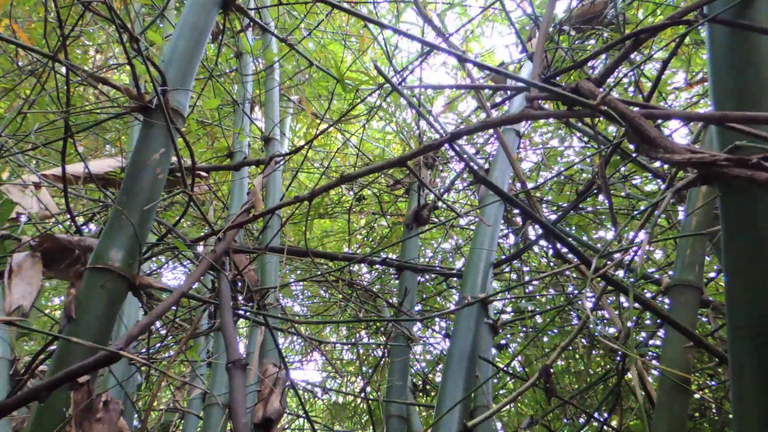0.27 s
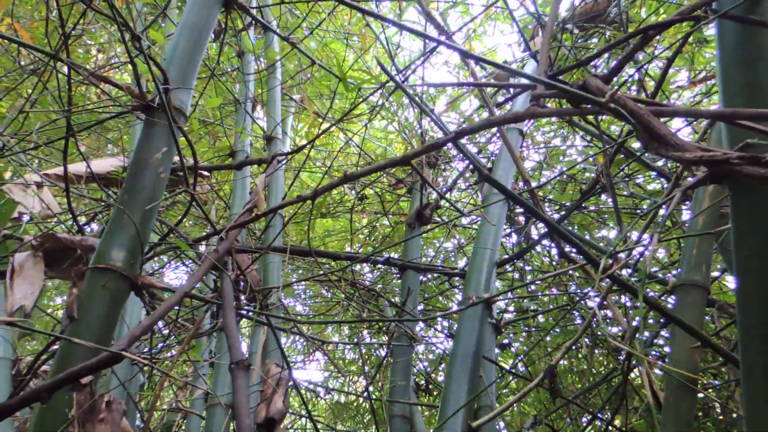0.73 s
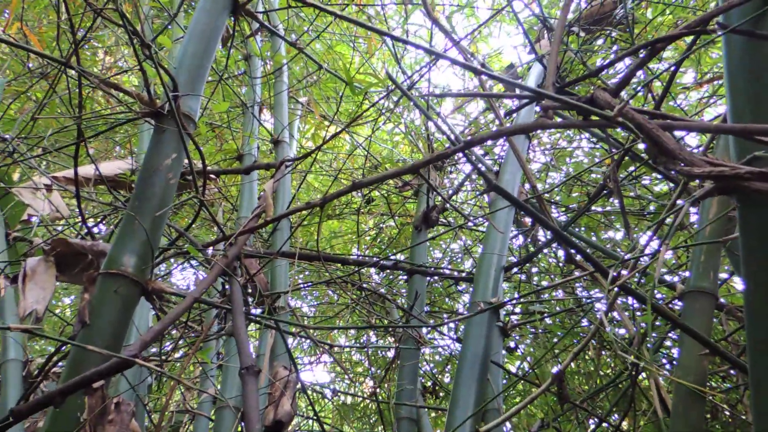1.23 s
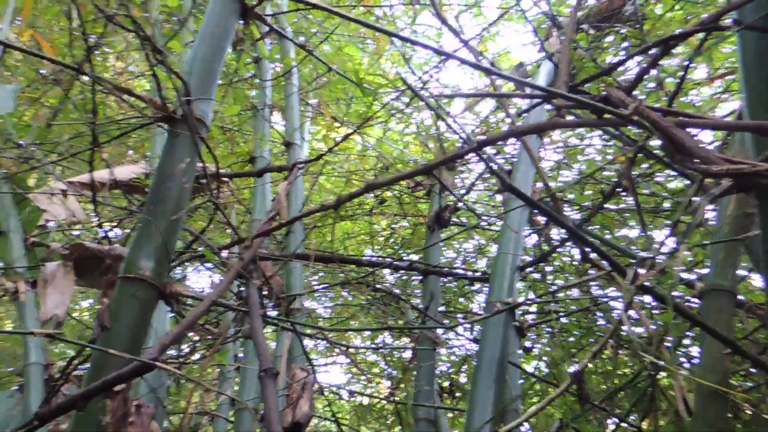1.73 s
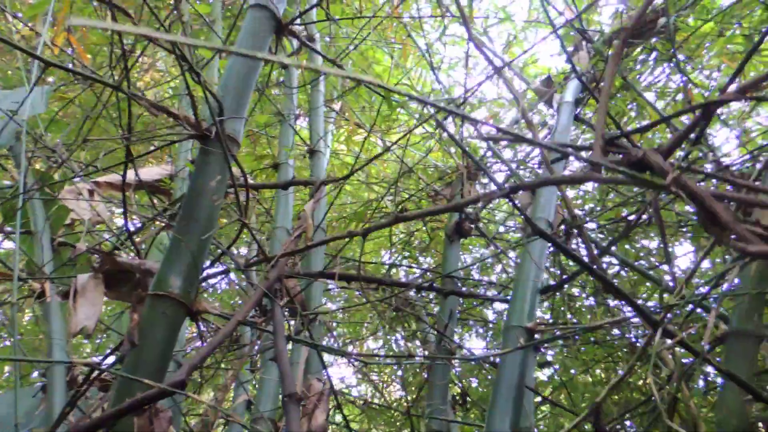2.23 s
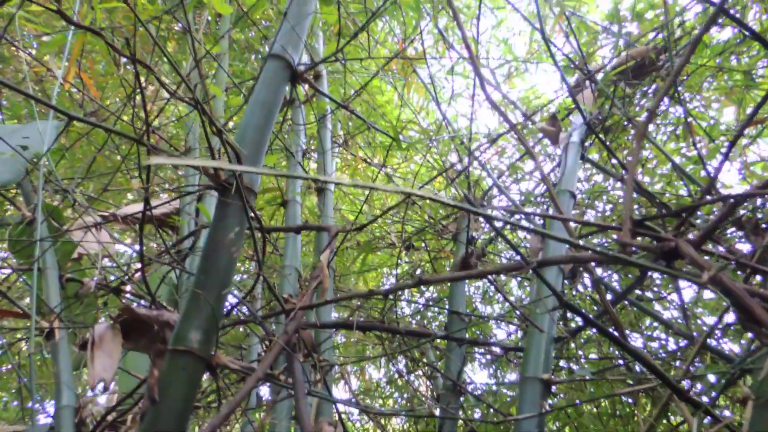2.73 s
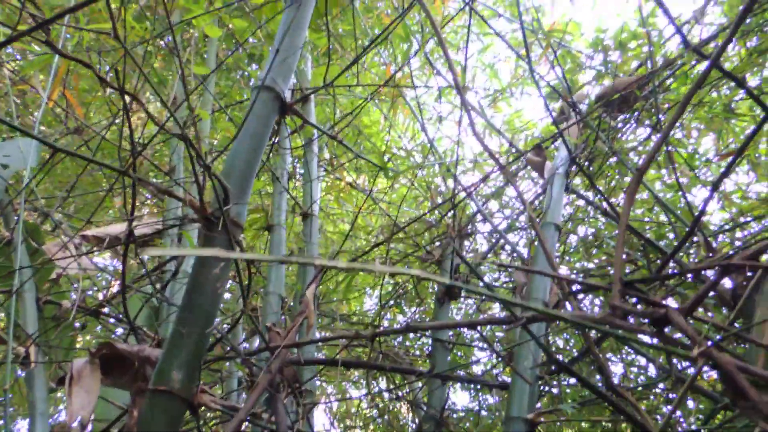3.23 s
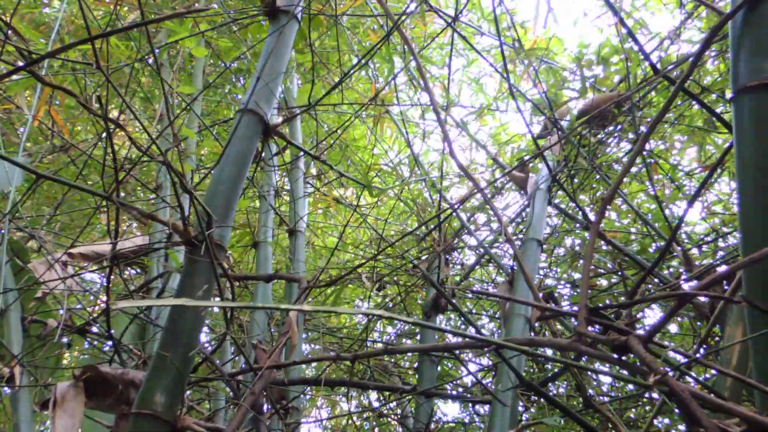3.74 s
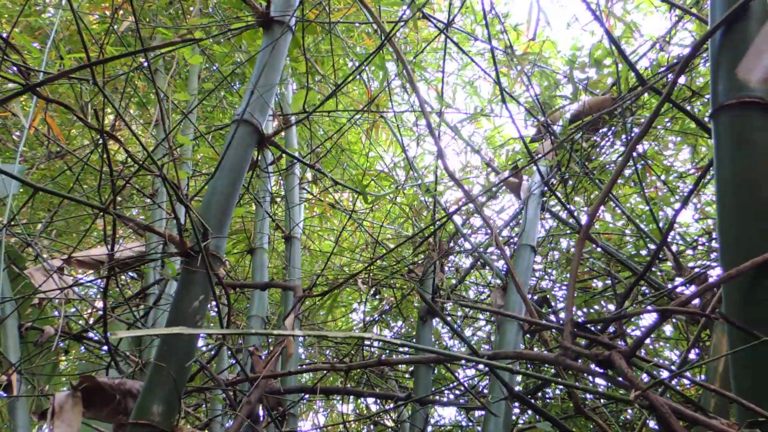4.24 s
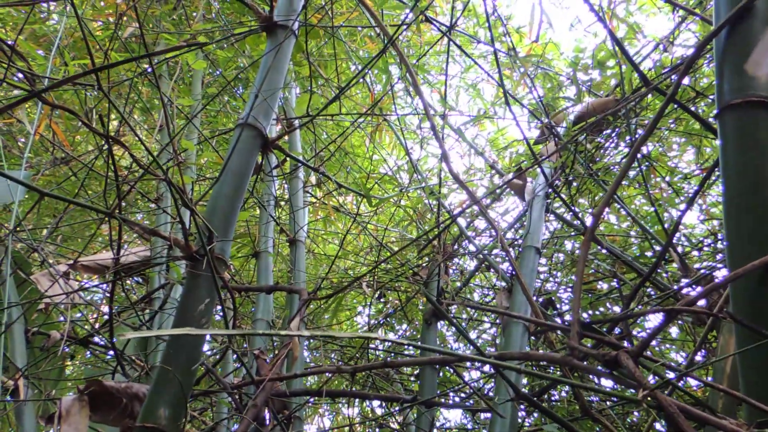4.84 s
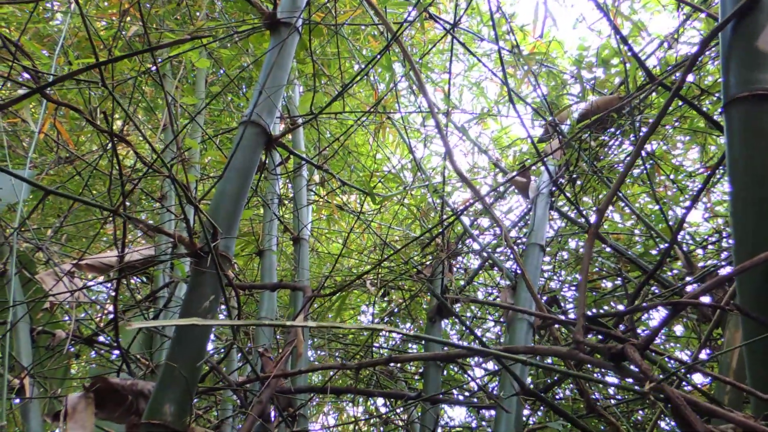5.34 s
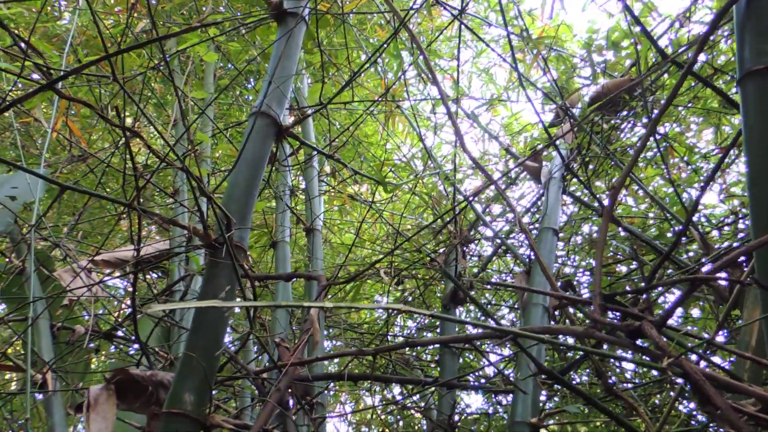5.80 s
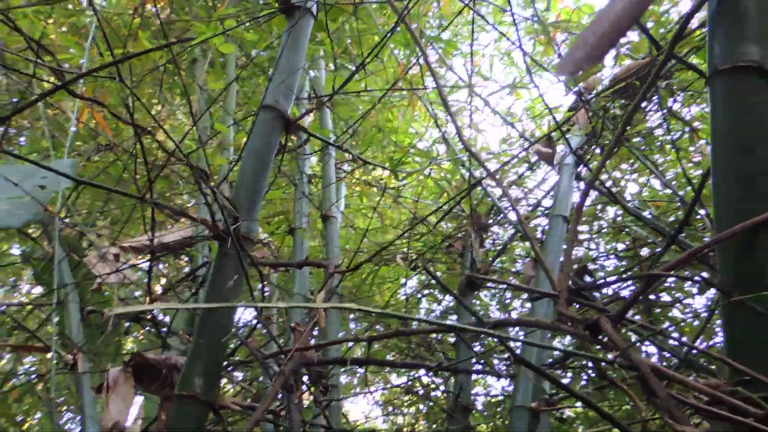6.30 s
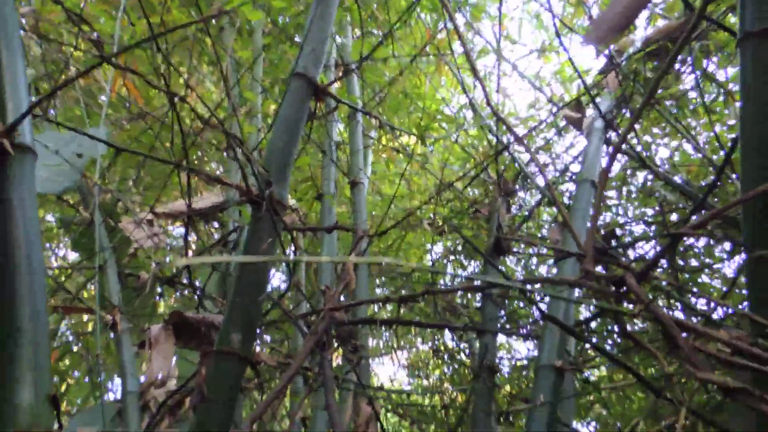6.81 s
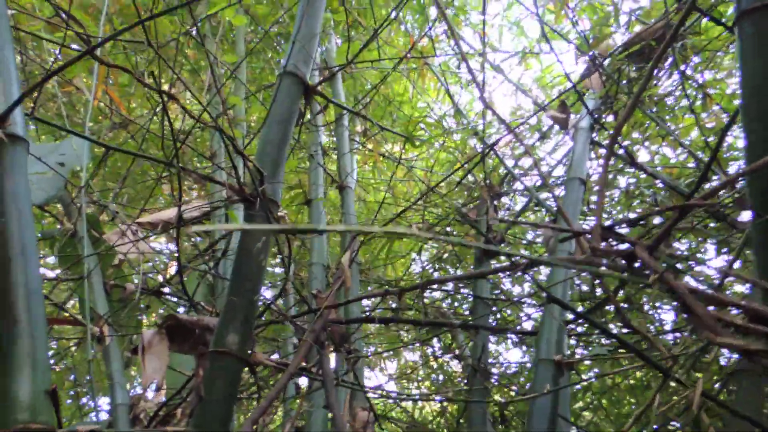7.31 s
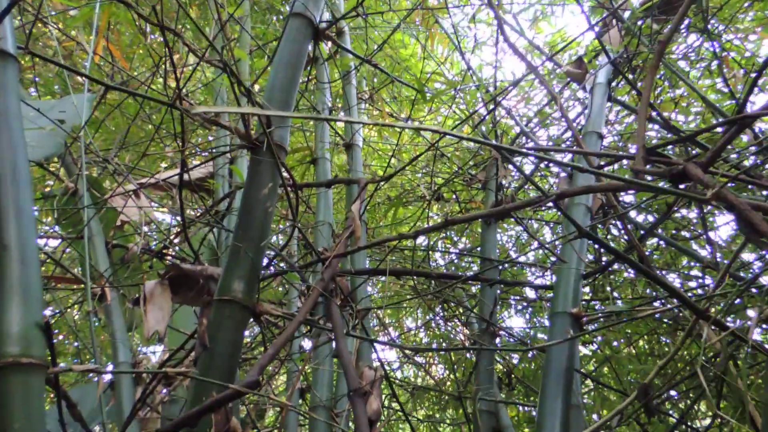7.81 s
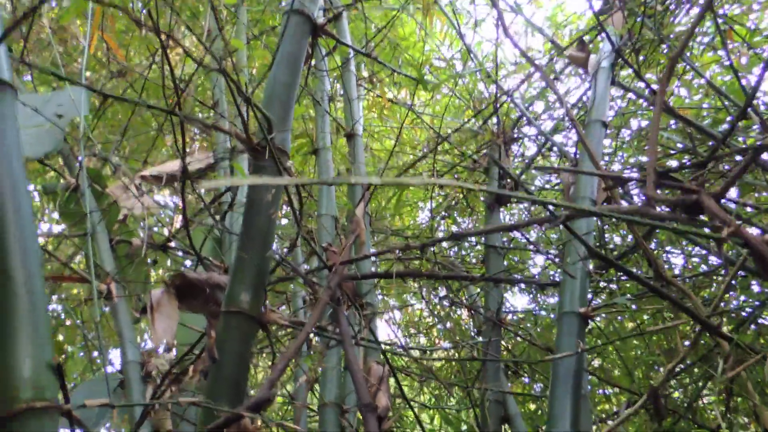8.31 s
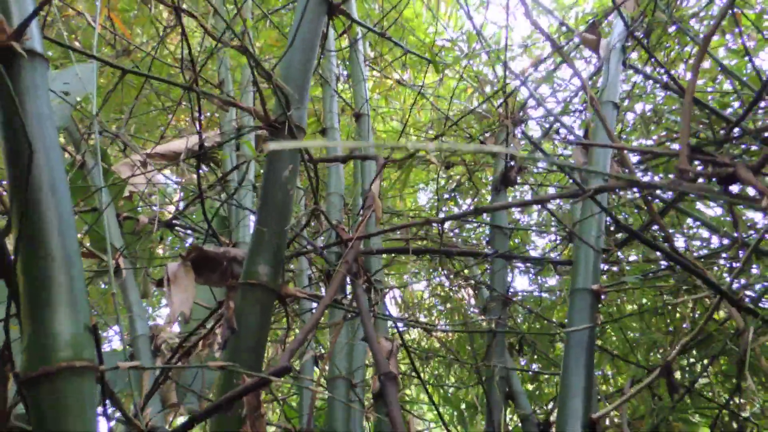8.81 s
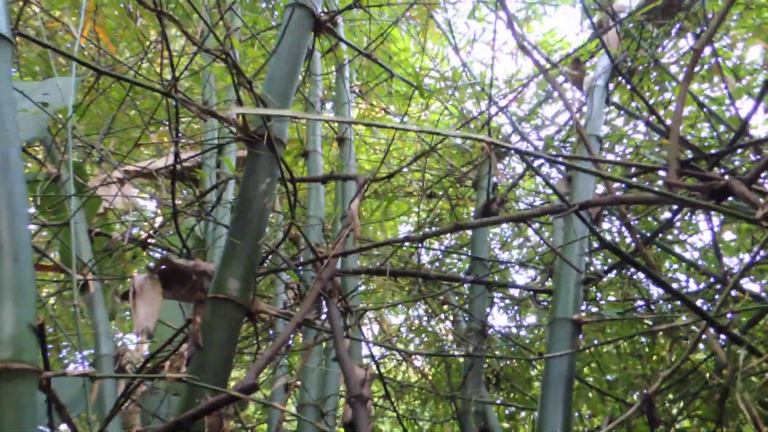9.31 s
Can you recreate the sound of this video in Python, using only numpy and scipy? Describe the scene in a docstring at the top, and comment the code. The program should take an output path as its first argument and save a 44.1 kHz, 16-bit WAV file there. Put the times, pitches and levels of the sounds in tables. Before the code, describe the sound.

One small bird repeats a clear, high three-note whistle three times, scattered into a short tail by the stems. Beneath it run a constant rasping cicada, a soft pulsing cricket and a low woodland wash. After the second phrase, dry leaves crackle close by, with tiny twig snaps around the last phrase. Faint distant birds and a wavering motor hum are behind. The handheld microphone feeds the right side; the left only hisses faintly.

```python
"""A small bird whistles a three-note phrase three times; bamboo stems scatter it into a dense tail.
The bird is a gliding near-sine, the cicada and the cricket are noise ringing at a few pitches,
the leaves are crackling hiss, the twigs short ticks, the far birds gliding tones and the far motor two wavering tones.
One microphone feeds only the right input; the left carries the hiss of its own amplifier.
A steady low tone is in both inputs."""
import sys
import numpy as np
from scipy import signal
from scipy.fft import rfft, irfft
from scipy.io import wavfile
from scipy.ndimage import uniform_filter1d

SR = 44100
rng = np.random.default_rng(int(sys.argv[2]) if len(sys.argv) > 2 else 0)


def file_out(sig):
    """Save sig as 16-bit WAV at sys.argv[1]."""
    # one column per channel
    cols = np.atleast_2d(sig).T
    # limit, then scale
    lim = np.clip(cols, -1, 1)
    pcm = np.round(lim * 32767).astype(np.int16)
    wavfile.write(sys.argv[1], SR, pcm)


N = 421155
T = np.arange(N) / SR  # time of every sample [s]

# Levels at the microphone count before the input's gain in record().
# The bird's three note shapes: (share of the note's length, pitch / home pitch, level [dB])
RISE_SHAPE = [(0, 1., -24), (.15, 1.025, -5.5), (.3, 1.07, 0), (.45, 1.16, -3.5), (.6, 1.27, -4.5),
              (.75, 1.3, -8.5), (1, 1.28, -10)]
HOOK_SHAPE = [(0, 1.44, -19), (.08, 1.29, -13), (.15, 1.08, -4), (.24, 1., 0), (.34, 1.02, -1.5),
              (.44, 1.085, 0.5), (.64, 1.22, -1), (.79, 1.32, -0.5), (.87, 1.45, -0.5), (.93, 1.61, -3.5),
              (1, 1.8, -9)]
SLIDE_SHAPE = [(0, 0.935, -13), (.05, .985, -4), (.1, 1., -0.5), (.25, .95, -1.5), (.38, .84, -5),
               (.53, .68, -17), (.65, .63, -19.5), (.85, .75, -14.5), (1, .77, -19)]
# The notes sung in each shape: (start [s], length [s], home pitch [Hz], last pitch [Hz], level [dB],
# lift of the opening [dB], lift of the close [dB])
RISE_NOTES = [(1.165, 0.076, 2833, 3530, -30.5, -2, 4.5), (4.95, 0.08, 2803, 3590, -32, 13, 0),
              (8.016, .084, 2838, 3570, -31.5, -11, 0)]
HOOK_NOTES = [(1.455, 0.1, 2810, 5150, -26.5, -4., -2.), (5.249, 0.098, 2780, 4700, -26.5, 5.5, -1.5),
              (8.308, 0.1, 2793, 5300, -28, -3., -1.27)]
SLIDE_NOTES = [(1.645, 0.13, 2500, 1900, -30, -1.5, -9), (5.446, 0.12, 2446, 1920, -34.5, 1.3, 6),
               (8.51, .125, 2473, 1930, -34.5, -2., 0)]
OPENING, CLOSE = 0.11, 0.23  # shares of a note over which these lifts fade
# Faint overtones of the bird: (multiple of the pitch, level [dB])
BIRD_OVERTONES = [(2, -52), (3, -28.5), (4, -44), (6, -31)]
# Extra overtone level towards the top: (frequency [Hz], lift [dB])
OVERTONE_LIFT = [(5000, -6), (9000, -6.5), (11000, -5), (12500, 7.5), (14000, 12)]
# Brief dips and jumps of the song's level: (time [s], width [s], change [dB])
SONG_CATCHES = [(1.216, .006, -7), (1.462, .006, -1), (1.542, 0.0045, 2.5), (5.28, 0.0095, -8),
                (5.293, .006, 5), (5.311, .005, -3), (8.076, 0.0066, -12)]

# Time the late scattered tail takes to die by 60 dB: (frequency [Hz], time [s])
TAIL_TIMES = [(1500, 0.97), (3000, 0.48), (5000, 0.84), (12000, 0.6)]
# Strength of the scattered tail: one level per phrase [dB]
PHRASE_SCATTER_DB = [.5, 0., 1.5]
# Single echoes off the closest stems: (delay [s], level [dB])
NEAR_ECHOES = [(.0031, -20.5), (.0079, -13), (0.0131, -17), (.021, -11.5)]

# The cicada's strength: (time [s], level [dB], lift of the steady rings [dB])
BUZZ_LEVELS = [(0, -44, 0.5), (1.1, -44.5, 1), (2.45, -44, 2.5), (2.65, -45, -4.), (3.8, -43.5, -1),
               (4.5, -43.5, 1), (4.75, -43, 1), (6.5, -44, .5), (8.3, -43.5, 0.5), (9.55, -44.5, -1.5)]
# Drift of the buzz beat: (time [s], lead [beats])
BUZZ_DRIFT = [(0, 0.16), (2.3, 0.13), (3.8, 0.49), (5.7, 0.18), (6.6, 0.04), (7.5, -.08), (8.2, -0.16),
              (9.55, -0.23)]
# Resonances of the cicada's body: (frequency [Hz], width [Hz], relative level [dB])
BODY_RINGS = [(5858, 90, -14), (5922, 47, -14.5), (6104, 120, -7), (6360, 217, -3), (6894, 140, -10),
              (7440, 700, -13.5), (12700, 300, -26)]
# Its steadiest rings, kept from beat to beat: (middle frequency [Hz], width [Hz], relative level [dB])
STEADY_RINGS = [(6300, 49, -8), (6374, 51, -6.5), (6450, 53, -6.5)]
BUZZ_PER_S, BUZZ_SAG_HZ_PER_S = 80.8, 5.  # the steady rings sink slowly
BUZZ_WAVER_DB, BUZZ_WAVERS_PER_S = .7, 12.

# The cricket's pace and strength: (time [s], lead over the steady beat [chirps], level [dB])
CRICKET_PACE = [(0, -.55, -50.5), (.9, -.76, -49), (1.6, -0.68, -47.5), (2.0, -0.58, -50),
                (2.8, -0.56, -50.5), (3.7, -.28, -48.5), (4.3, -0.28, -51), (4.7, -0.3, -46.5),
                (5.4, -0.2, -49.5), (5.85, -0.34, -51), (6.02, -.3, -56), (6.2, -0.19, -48),
                (6.7, -0.55, -56), (7.0, -.74, -57), (7.7, -.85, -61), (7.95, -.6, -52), (8.3, -.98, -55),
                (8.7, -1.18, -52), (9.2, -1.36, -50), (9.35, -1.4, -60), (9.55, -1.15, -54)]
CHIRPS_PER_S = 5.7
CHIRP_SPREAD_DB, CHIRP_JITTER_S, CHIRP_SPREAD_HZ = 0.2, .007, 40.

# Tone colour of the leaves: (frequency [Hz], relative level per Hz [dB])
LEAF_COLOUR = [(300, -10), (1500, -10.5), (4000, -2.5), (6000, 2.5), (10000, -5), (14000, -.5)]
# Quiet stir of the leaves: (time [s], level [dB])
LEAF_STIR = [(0, -78), (3.9, -60), (4.2, -57), (5.2, -59), (6.3, -56), (7.6, -57), (9.55, -63)]
# Rustles that swell and die around a peak: (peak time [s], level [dB], swell [s], die [s])
LEAF_RUSTLES = [(4.57, -52, .05, .05), (6.04, -51, .08, .1), (6.5, -45, .06, .2), (6.73, -41, 0.1, 0.13),
                (7.02, -48.5, 0.28, 0.16), (7.45, -49.5, .12, 0.11), (8.05, -56, .05, .05),
                (8.4, -45, .05, .05), (8.6, -47, 0.054, .05), (8.73, -44.5, 0.083, 0.086),
                (9.0, -55, .07, .06), (9.28, -54, .1, .2)]
# Dry ticks of twigs: (time [s], peak level [dB], frequency [Hz])
TWIG_TICKS = [(4.906, -31, 5200), (7.08, -42, 11500), (7.27, -36, 4500), (7.443, -34, 2500),
              (7.798, -44, 10000), (8.204, -43, 11000), (8.331, -31, 11400), (8.38, -35, 12000),
              (8.43, -34, 8000), (8.589, -41, 9500), (9.18, -37, 5000)]

# Short far whistles, levels before the mix: (start [s], length [s], first pitch [Hz], last pitch [Hz], level [dB])
FAR_WHISTLES = [(1.002, 0.032, 1150, 1900, -56), (5.589, 0.09, 5340, 4000, -60),
                (7.58, 0.09, 5100, 3720, -56.5), (7.724, .03, 3210, 3080, -61),
                (7.799, .115, 5380, 2990, -59.5)]
FAR_FLUTTER_DB = 2.

# Far wash of the woods: (frequency [Hz], level per Hz [dB])
WASH_COLOUR = [(20, -82.5), (45, -79.5), (130, -85), (220, -85), (350, -83), (460, -86), (800, -83.5),
               (1300, -84.5), (2500, -87.5), (3200, -91), (5400, -91), (8500, -98), (10500, -99),
               (14000, -100)]
# The motor draws nearer: (time [s], low tone [Hz], low tone level [dB], upper tone level [dB])
MOTOR_TONES = [(0, 120, -72, -69), (3.5, 120, -70, -72), (4.5, 122, -63, -70), (5.2, 120, -68, -68),
               (6.5, 117, -63, -66), (7.3, 122, -60, -66), (8, 128, -59, -70), (8.9, 128, -58, -62),
               (9.1, 127, -59, -66), (9.55, 126, -60, -67)]
HUM_UPPER_HZ = 288.6  # middle pitch of the upper tone
RUMBLE_DB = -1.5  # bass noise against the low tone
# Hiss of the left input's amplifier: (frequency [Hz], level per Hz [dB])
AMPLIFIER_HISS = [(12, -72.5), (25, -75.5), (50, -76.5), (100, -80), (250, -85.5), (600, -91), (1200, -95),
                  (3000, -96.5), (7000, -100.0), (12000, -101.9)]
# Likeness of the hiss and the wash in the bass: (frequency [Hz], share)
SHARED_BASS = [(20, 0.77), (40, 0.54), (70, 0.49), (240, 0.26), (700, 0.014)]
# The steady low tone: (frequency [Hz], left level [dB], right level [dB])
STEADY_LOW_TONE = (30., -61, -60.5)
EDGE_HZ = 14170  # top of the band


def gain_of(db):
    """Turns decibels into gain."""
    return 10 ** (np.asarray(db) / 20)


def evened(x):
    """Scales a sound to an average (rms) strength of 1."""
    return x / np.sqrt(np.mean(x ** 2) + 1e-20)


def over_time(points):
    """Reads a (time, value) table at every sample."""
    return np.interp(T, *np.transpose(points))


def read(points, hz):
    """Reads a (frequency, value) table on a log-frequency axis."""
    f, value = np.transpose(points)
    return np.interp(np.log(hz + 1), np.log(f + 1), value)


def coloured(x, points):
    """Gives white noise of strength 1 the power per Hz listed in a table."""
    gain = gain_of(read(points, np.fft.rfftfreq(N, 1 / SR)))
    return irfft(rfft(x) * gain * np.sqrt(SR / 2), N)


def add(mix, s, sound):
    """Mixes a sound in at time s, cut off at the end of the mix."""
    part = mix[round(s * SR):][:len(sound)]
    part += sound[:len(part)]


def resonate(x, hz, width):
    """Shifts hz down to zero, smooths twice and shifts back: a steep resonance of gain 1."""
    turn = np.exp(2j * np.pi * np.cumsum(hz * np.ones(len(x))) / SR)
    r = np.exp(-np.pi * width / SR)
    smooth = signal.lfilter([(1 - r) ** 2], [1, -2 * r, r * r], x / turn)
    return 2 * (turn * smooth).real


def drift(per_s):
    """Wanders along straight lines between random values of spread 1, per_s of them a second."""
    knots = rng.standard_normal(4000)
    return np.interp(T * per_s, np.arange(4000), knots)


def patches(shape, bins, frames):
    """Random values of rms 1, smoothed over neighbouring pitches and moments."""
    across_pitch = uniform_filter1d(rng.standard_normal(shape), bins, 0)
    return evened(uniform_filter1d(across_pitch, frames, 1))


def bird():
    """A near sine with faint overtones follows the pitch and level of each note's shape."""
    out = np.zeros(N)
    for shape, notes in (RISE_SHAPE, RISE_NOTES), (HOOK_SHAPE, HOOK_NOTES), (SLIDE_SHAPE, SLIDE_NOTES):
        share, ratio, shape_db = np.transpose(shape)
        for s, length, home_hz, last_hz, db, opening_db, close_db in notes:
            u = np.arange(0, length, 1 / SR) / length  # 0 to 1 through the note
            corners_hz = [*(home_hz * ratio[:-1]), last_hz]
            hz = uniform_filter1d(np.interp(u, share, corners_hz), 150, mode="nearest")
            angle = 2 * np.pi * np.cumsum(hz) / SR
            voice = np.sin(angle)
            for k, overtone_db in BIRD_OVERTONES:
                level = gain_of(overtone_db + read(OVERTONE_LIFT, k * hz))
                voice += level * np.sin(k * angle) * (k * hz < SR / 2)
            lift_db = opening_db * np.exp(-u / OPENING) + close_db * np.exp((u - 1) / CLOSE)
            level = np.sqrt(2) * gain_of(db + lift_db + np.interp(u, share, shape_db))
            add(out, s, level * voice * signal.windows.tukey(len(u), .1))
    catch_db = sum(db * np.exp(-((T - s) / width) ** 2) for s, width, db in SONG_CATCHES)
    return out * gain_of(catch_db)


def near_stems(x):
    """The closest stems send back single echoes that beat with a gliding note."""
    out = x.copy()
    for delay, db in NEAR_ECHOES:
        add(out, delay, gain_of(db) * x)
    return out


def thicket(x, gap_s=0.0034, uneven_db=3.5, patchy_db=2.5, early=1.2, early_t60=0.14):
    """Random echoes off the stems die band by band; each phrase gets new ones as the microphone sways."""
    out = np.zeros(N + SR)
    for k, part in enumerate(np.array_split(x, 3)):  # each third holds one phrase
        taps = np.zeros(SR // 2)
        at = np.arange(0, len(taps) - 40, 40)
        size = rng.choice([-1., 1.], len(at)) * gain_of(uneven_db * rng.standard_normal(len(at)))
        taps[at + rng.integers(0, 40, len(at))] = size
        taps[:round(gap_s * SR)] = 0
        hz, t, z = signal.stft(taps, SR, nperseg=256)
        z = z * gain_of(patchy_db * patches(z.shape, 2, 8))  # some pitches linger, others drop out
        late_fade = gain_of(-60 * t / read(TAIL_TIMES, hz)[:, None])
        early_fade = early * gain_of(-60 * t / early_t60)
        tail = signal.istft(z * (late_fade + early_fade), SR, nperseg=256)[1]
        scattered = signal.fftconvolve(part, tail / np.linalg.norm(tail))
        add(out, k * (N // 3) / SR, gain_of(PHRASE_SCATTER_DB[k]) * scattered)
    return out[:N]


def cicada(depth=0.45, ring=0.29):
    """Bursts of rib clicks, one burst a beat, ring the body at a few pitches."""
    beat = (BUZZ_PER_S * T + over_time(BUZZ_DRIFT) + .2) % 1
    burst = 1 - depth + depth * 1.8 * np.exp(-beat / ring)
    drive = rng.standard_normal(N) * burst
    s, level_db, rings_db = np.transpose(BUZZ_LEVELS)
    body = sum(gain_of(db) * evened(resonate(drive, hz, width)) for hz, width, db in BODY_RINGS)
    for hz, width, db in STEADY_RINGS:
        sinking_hz = hz - BUZZ_SAG_HZ_PER_S * (T - T.mean())
        tone = resonate(rng.standard_normal(N), sinking_hz, width)
        # the strength is held nearly steady while the phase wanders
        tone /= np.sqrt(uniform_filter1d(tone ** 2, 200) + 0.11 * np.mean(tone ** 2))
        pulsed = evened(tone * uniform_filter1d(burst, 90))
        body += gain_of(db + np.interp(T, s, rings_db)) * pulsed
    waver_db = BUZZ_WAVER_DB * drift(BUZZ_WAVERS_PER_S)
    return evened(body) * gain_of(np.interp(T, s, level_db) + waver_db)


def cricket(length=.16, from_hz=7010, to_hz=7200, strokes_per_s=56.4):
    """Each chirp is a few wing strokes on a resonance that climbs; no two are quite alike."""
    out, t = np.zeros(N), np.arange(0, length, 1 / SR)
    strokes = 0.6 + np.sin(np.pi * strokes_per_s * t) ** 2
    s, lead, db = np.transpose(CRICKET_PACE)
    beats = np.floor(CHIRPS_PER_S * T + np.interp(T, s, lead))
    middles = T[1:][np.diff(beats) > 0]
    noise = rng.standard_normal((60, 12003))
    for middle, (loud, late, high, *scrape) in zip(middles, noise):
        hz = np.linspace(from_hz, to_hz, len(t)) + CHIRP_SPREAD_HZ * high
        wing = resonate(np.array(scrape[:len(t)]) * strokes, hz, 230.0)
        level = gain_of(np.interp(middle, s, db) + CHIRP_SPREAD_DB * loud)
        start = max(middle + CHIRP_JITTER_S * late - length / 2, 0)
        add(out, start, level * evened(wing) * signal.windows.tukey(len(t), .7))
    return out


def rustle():
    """Dense leaf crackle: small clicks of uneven size over hiss."""
    size = gain_of(2.5 * np.minimum(rng.exponential(1, N), 5))
    clicks = size * (rng.random(N) < 3000. / SR)  # about 3000 a second
    drive = rng.standard_normal(N) * (1 + 0.37 * evened(clicks))
    leaves = coloured(drive, LEAF_COLOUR)
    power = gain_of(over_time(LEAF_STIR)) ** 2
    for s, db, swell, die in LEAF_RUSTLES:
        width = np.where(T < s, swell, die)
        power = power + gain_of(db) ** 2 * np.exp(-2 * ((T - s) / width) ** 2)
    return evened(leaves) * np.sqrt(power) * gain_of(1.3 * drift(70.))


def twigs():
    """Short dry ticks: sines that die by 60 dB in 3.9 ms."""
    out, t = np.zeros(N), np.arange(400) / SR
    for s, db, hz in TWIG_TICKS:
        add(out, s, gain_of(db - 60 * t / 0.0039) * np.sin(2 * np.pi * hz * t))
    return out


def far_birds():
    """Gliding whistles whose level flutters on the way."""
    out = np.zeros(N)
    for s, length, from_hz, to_hz, db in FAR_WHISTLES:
        t = np.arange(0, length, 1 / SR)
        whistle = signal.chirp(t, from_hz, length, to_hz, "logarithmic")
        add(out, s, gain_of(db) * whistle * signal.windows.tukey(len(t), .3))
    return out * gain_of(FAR_FLUTTER_DB * drift(120.))


def hum():
    """The far motor: two low tones of wavering pitch and level over bass noise."""
    s, *columns = np.transpose(MOTOR_TONES)
    low_hz, low_db, upper_db = (np.interp(T, s, c) for c in columns)
    low_angle = 2 * np.pi * np.cumsum(low_hz + 3.51 * drift(14.)) / SR
    low = np.sin(low_angle) * gain_of(low_db + 4.1 * drift(8.0))
    upper_angle = 2 * np.pi * np.cumsum(HUM_UPPER_HZ + 2.42 * drift(14.)) / SR
    upper = np.sin(upper_angle) * gain_of(upper_db + 5.4 * drift(5.))
    rumble = evened(resonate(rng.standard_normal(N), 83.0, 70.)) * gain_of(low_db + RUMBLE_DB)
    return np.sqrt(2) * (low + upper) + rumble


def air(white):
    """The far wash of the woods: coloured noise with drifting patches and a slowly wavering level."""
    z = signal.stft(white, nperseg=512)[2]
    patchy = signal.istft(z * gain_of(1.3 * patches(z.shape, 5, 10)), nperseg=512)[1][:N]
    return coloured(patchy, WASH_COLOUR) * gain_of(0.59 * drift(2.985))


def amplifier(white):
    """Hiss of the unused input: coloured noise that shares some bass with the wash's noise."""
    other = rng.standard_normal(N)
    same = np.clip(read(SHARED_BASS, np.fft.rfftfreq(N, 1 / SR)), 0, 1)
    mixed = irfft(same * rfft(white) + np.sqrt(1 - same ** 2) * rfft(other), N)
    return coloured(mixed, AMPLIFIER_HISS)


def scene():
    """Row 0 holds the amplifier hiss of the unused left input, row 1 the sound at the microphone."""
    white = rng.standard_normal(N)
    song, far, ticks = bird(), far_birds(), twigs()
    # the far birds are heard mostly through the stems
    scattered = thicket(gain_of(-3.0) * song + gain_of(8.0) * far + gain_of(-5.0) * ticks)
    whistles = near_stems(song + gain_of(-11.) * far)
    heard = whistles + scattered + cicada() + cricket() + rustle() + ticks + hum() + air(white)
    return np.array([amplifier(white), heard])


def record(dry):
    """The microphone input has 6 dB of gain; a low tone joins both inputs; then the band limit."""
    hz, *db = STEADY_LOW_TONE
    low_tone = np.sqrt(2) * gain_of(db)[:, None] * np.sin(2 * np.pi * hz * T)
    inputs = dry * [[1], [2]] + low_tone
    band_limit = signal.firwin(1023, EDGE_HZ, window=("kaiser", 10), fs=SR)
    return signal.oaconvolve(inputs, band_limit[None], "same")


dry = scene()
out = record(dry)
file_out(out)
```